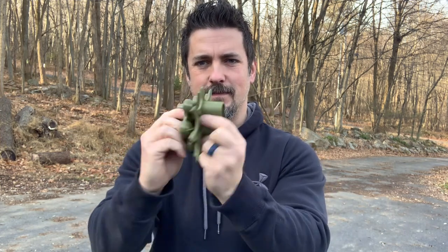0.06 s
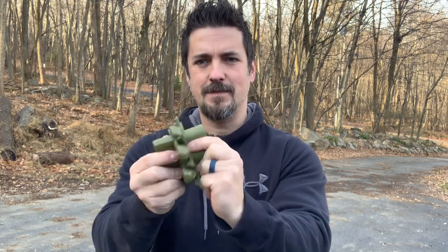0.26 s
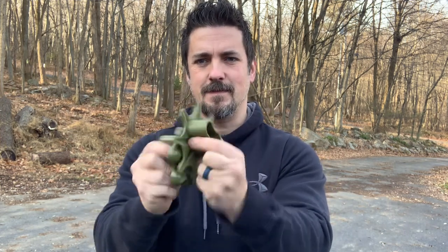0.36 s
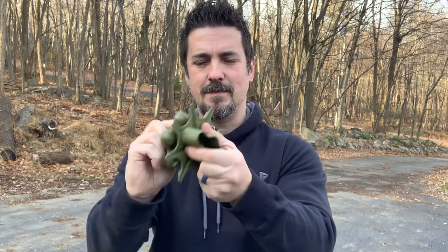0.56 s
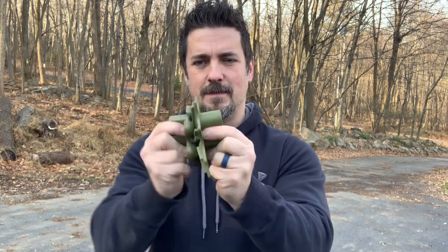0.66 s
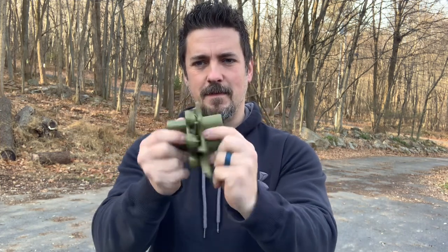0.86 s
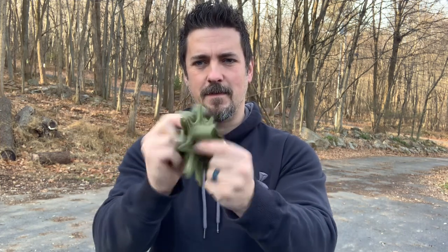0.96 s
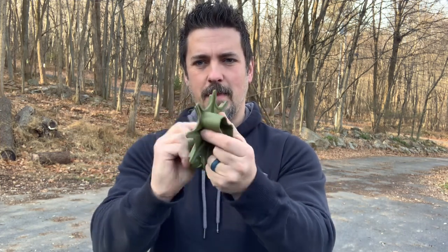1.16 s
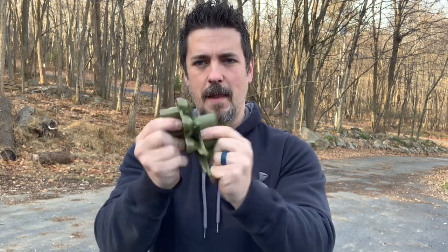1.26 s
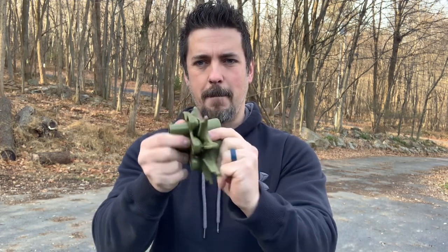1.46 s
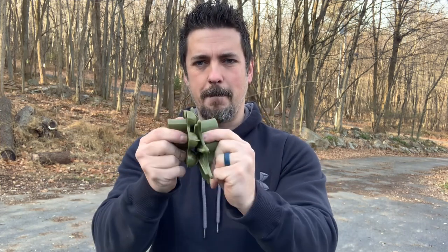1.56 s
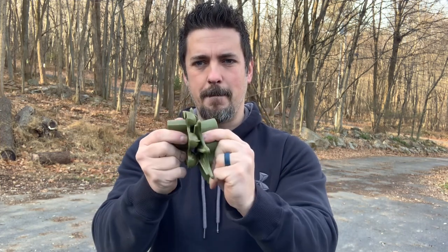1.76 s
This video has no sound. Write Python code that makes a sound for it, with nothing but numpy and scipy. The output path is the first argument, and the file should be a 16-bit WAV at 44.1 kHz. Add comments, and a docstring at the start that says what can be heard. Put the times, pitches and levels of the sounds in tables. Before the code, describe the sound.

A hand-held plastic deer rattle is worked close to a stereo microphone, sharp clicks and gritty scrapes coming in quick uneven clusters, with small hollow thunks, faint answers from the trees and a low outdoor rumble.

```python
"""Outdoors among trees, a hand-held deer rattle is worked in quick runs before a stereo microphone pair.
A low rumble with a trace of hiss lies behind it, made of filtered noise and stronger on the right.
Two toothed plastic halves clash and grind: each contact is a scraping crack of noise that rings
decaying plastic modes; square seatings add thunks of the hollow grips. Hands and body scatter the
sound close by, and the trunks answer faintly through decaying noise tails."""
import sys
import numpy as np
from scipy import signal
from scipy.fft import rfft, irfft, next_fast_len
from scipy.io import wavfile
from scipy.ndimage import uniform_filter1d, minimum_filter1d, map_coordinates

SR = 44100
rng = np.random.default_rng(int(sys.argv[2]) if len(sys.argv) > 2 else 0)


def bounce(signal):
    """Save signal as a 16-bit WAV file at the path given by the first command-line argument."""
    frames = np.transpose(np.atleast_2d(signal))
    limited = np.clip(frames, -1, 1)
    pcm = np.round(limited * 32767).astype(np.int16)
    wavfile.write(sys.argv[1], SR, pcm)


N = 79380  # samples, 1.8 s


def amp(db):
    """Decibels to gain."""
    return 10 ** (np.asarray(db) / 20)


def unit(x):
    """Scale to rms 1."""
    return x / np.sqrt(np.mean(x ** 2) + 1e-20)


def along(points, hz):
    """Read a curve of (frequency, value) points on a log frequency axis."""
    point_hz, value = np.transpose(points)
    return np.interp(np.log(hz + 1), np.log(point_hz + 1), value)


def filtered(x, response):
    """Filter x by a complex response, given as a function of frequency."""
    size = next_fast_len(N + SR // 2)
    spectrum = rfft(x, size) * response(np.fft.rfftfreq(size, 1 / SR))
    return irfft(spectrum, size)[..., :N]


def causal(gain):
    """Minimum-phase response with the shape of the given gain and unit energy."""
    cepstrum = irfft(np.log(gain + 1e-9))
    half = cepstrum.shape[-1] // 2
    # fold the backward half onto the forward half
    cepstrum[..., 1:half] *= 2
    cepstrum[..., half + 1:] = 0
    response = np.exp(rfft(cepstrum))
    return response / np.sqrt(np.mean(np.abs(response) ** 2, axis=-1, keepdims=True))


# colour of the outdoor floor: freq_hz [Hz], relative density_db [dB per Hz]
AIR_COLOUR = [(20, -39), (40, -12.5), (62, -1.5), (100, -10), (150, -15), (230, -28), (500, -35.5),
              (1000, -32.5), (2000, -32), (6000, -41.5), (8500, -62), (15000, -52.5)]
AIR_DB, AIR_LEFT_DB = -59, -13  # floor level; left against right
SWELL_DB, SWELL_POINTS_PER_S = 3.5, 13  # greatest rise or fall; random level points per second
RUMBLE_HZ = 220  # soft upper edge of the part that swells


def air():
    """Low outdoor rumble that swells gently under a steady trace of hiss, stronger on the right."""
    shared, extra = filtered(rng.standard_normal((2, N)), lambda hz: amp(along(AIR_COLOUR, hz)))
    pair = np.array([shared + .5 * extra, shared])
    rumble = filtered(pair, lambda hz: np.exp(-(hz / RUMBLE_HZ) ** 2))
    position = np.arange(N) * SWELL_POINTS_PER_S / SR
    wander = map_coordinates(rng.standard_normal(SR // 100), [position])
    swell = amp(SWELL_DB * np.tanh(wander))
    left, right = pair + (swell - 1) * rumble
    return amp(AIR_DB) * np.array([amp(AIR_LEFT_DB) * unit(left), unit(right)]) * np.sqrt(2)


def answer(colour, t60, size):
    """Stereo scatter tail of decaying noise, left at unit energy; t60 is a function of frequency."""
    hz, t, noise = signal.stft(rng.standard_normal((2, size)), SR, nperseg=256)
    hz = hz[:, None]
    level_db = along(colour, hz) - 60 * t / t60(hz)
    tail = signal.istft(noise * amp(level_db), SR, nperseg=256)[1]
    return tail / np.linalg.norm(tail[0])


# how long the trunks answer: freq_hz [Hz], t60_s [s]
TRUNK_DECAY = [(300, 1), (2000, 0.67), (7000, 0.44), (12000, 1.6)]
# colour of the trunks' answer: freq_hz [Hz], relative level_db [dB]
TRUNK_COLOUR = [(200, 18.5), (900, -1.5), (2000, 0), (5000, -2), (7400, -1), (8500, -10.5), (15000, -3)]
# colour of the close scatter off hands and body: freq_hz [Hz], relative level_db [dB]
BODY_COLOUR = [(300, 13.5), (2000, 23), (7000, -25), (10000, -3), (14000, 4.5)]
TRUNKS_DB, BODY_DB, BODY_T60_S = -23, -20, 0.05  # gain of each scatter; close decay


def woods(x, count=16):
    """Short scatter from hands and body, changing as they move, and a long faint answer from the trunks."""
    far = answer(TRUNK_COLOUR, lambda hz: along(TRUNK_DECAY, hz), SR)
    out = amp(TRUNKS_DB) * signal.fftconvolve(x[None], far, axes=1)[:, :N]
    for pose in range(count + 1):
        # crossfade from one pose to the next
        share = np.sqrt(np.maximum(0, 1 - np.abs(np.arange(N) * count / N - pose)))
        near = answer(BODY_COLOUR, lambda hz: BODY_T60_S, SR // 10)
        out += amp(BODY_DB) * signal.oaconvolve((x * share)[None], near, axes=1)[:, :N]
    return out


# level between the microphones: freq_hz [Hz], left_minus_right_db [dB]
MIC_BALANCE = [(100, -18.5), (400, -11.5), (750, -2), (1250, -4.5), (1800, -8.5), (2200, -9), (2700, -0.5),
               (3400, -17.5), (4700, -17.5), (5900, -14), (7100, 0.5), (8200, -1.5), (15000, 0.5)]
# phase between the microphones: freq_hz [Hz], left_lead_rad [rad]
MIC_LEAD = [(100, -2.5), (500, -1), (1050, -7), (1700, -6.5), (2600, -8), (3000, -8.5), (3600, -8),
            (4500, -7), (4900, -6), (6700, -4), (8000, -4), (11000, -2), (12700, -7)]


def ports(hz):
    """Gain and phase of the left and right microphones toward the rattle, at constant total power."""
    ratio = amp(along(MIC_BALANCE, hz))
    left = ratio * np.exp(1j * along(MIC_LEAD, hz))
    return np.array([left, np.ones(len(hz))]) * np.sqrt(2 / (1 + ratio ** 2))


RING_RISE_S, DETUNE = 0.00035, 0.02  # onset of every mode; its random spread of pitch, as a fraction
# modes of the hollow grips: pitch_hz [Hz, before detuning], relative level_db [dB], t60_s [s]
GRIP_MODES = [(915, -3, 0.039), (1134, 5.5, 0.014)]
# the halves seat squarely: start_s [s], level_db [dB, added to each mode's]
SEATINGS = [(0.246, -31), (0.4223, -29.5), (0.538, -38), (0.5556, -33), (0.7335, -34.5), (1.3083, -41),
            (1.3201, -26.5), (1.6103, -38)]


def knocks(size=4096):
    """When the halves seat squarely, the hollow grips give a short thunk of decaying modes."""
    t = np.arange(size) / SR
    out = np.zeros(N + size)
    for start_s, level_db in SEATINGS:
        start = round(start_s * SR)
        for pitch_hz, db, t60 in GRIP_MODES:
            fade = amp(level_db + db - 60 * t / t60) * (1 - np.exp(-t / RING_RISE_S))
            tuned_hz = pitch_hz * (1 + DETUNE * rng.standard_normal())
            out[start:start + size] += fade * np.sin(2 * np.pi * tuned_hz * t)
    return out[:N]


# colour of plastic slipping on plastic: freq_hz [Hz], relative density_db [dB per Hz]
CRACK_COLOUR = [(100, -34), (350, -20.5), (620, -18.5), (950, -16), (1350, -3.5), (1800, -3), (2200, 1),
                (2680, -9), (3150, -8.5), (3650, -3), (4300, -9), (4800, -11.5), (5900, -11), (7200, -15.5),
                (8000, -27), (9300, -21.5), (12200, -40), (14400, -43), (16000, -48.5)]


def crack(size):
    """Spectrum of one sharp slip of plastic on plastic."""
    return causal(amp(along(CRACK_COLOUR, np.fft.rfftfreq(size, 1 / SR))))


GRIND_PER_S, GRIND_DB = 1300, -19  # mean rate of slips; gain against the contact pressure
GRIND_AFTER_S = 0.0072  # time constant of the pressure's power


def grinding(clicks, size=4096):
    """Tiny slips at random moments follow each contact while the teeth slide under pressure."""
    keep = np.exp(-1 / (GRIND_AFTER_S * SR))
    pressure = np.sqrt(signal.lfilter([1 - keep], [1, -keep], clicks ** 2))
    slips = (rng.random(N) < GRIND_PER_S / SR) * rng.standard_normal(N)
    body = irfft(crack(size))
    return amp(GRIND_DB) * signal.fftconvolve(unit(slips) * pressure, body)[:N]


# modes of the plastic: pitch_hz [Hz, before detuning], relative level_db [dB], t60_s [s]
PLASTIC_MODES = [(1687, -7.5, 0.016), (1779, -1, 0.025), (2280, 1.5, 0.0087), (3070, -7, 0.04),
                 (3235, -0.5, 0.021), (3679, 3.5, 0.027), (4223, -11.5, .028), (4790, -1.5, 0.014),
                 (5547, -2, 0.012), (7390, -23.5, 0.025)]
CRACK_T60_S, CRACK_RISE_S = 0.0059, 0.0019
RING_DB, MODE_SCATTER_DB = -22, 0.5  # ring against crack; random spread of each mode's level
REBOUND_S, REBOUND_DB = 0.0025, -11  # a tooth bounces once: mean flight, level against the blow
SCRAPE_DB, SCRAPE_RISE_S, SCRAPE_FADE_S = -18, 0.0038, 0.0043  # level at mean force; around the blow
LIGHT_SCRAPES = 0.98  # dB more scrape for each dB that a contact is lighter


def strike(t):
    """Envelope of one blow: a quick rise into an exponential fade."""
    return amp(-60 * t / CRACK_T60_S) * (1 - np.exp(-t / CRACK_RISE_S))


def contacts(force_db, lead, size=4096):
    """Spectra of contacts: crack, rebound and brief scrape, plus modes struck differently each time."""
    count = len(force_db)
    clock = (np.arange(size) - lead) / SR  # zero at the blow
    t = np.maximum(clock, 0)
    flight = REBOUND_S * (.5 + rng.random((count, 1)))
    blow = strike(t) + amp(REBOUND_DB) * strike(np.maximum(clock - flight, 0))
    scrape_db = SCRAPE_DB - LIGHT_SCRAPES * (force_db - force_db.mean())[:, None]
    slide = np.exp(np.minimum(clock, 0) / SCRAPE_RISE_S - t / SCRAPE_FADE_S)
    scrape = amp(scrape_db) * strike(t).max() * slide
    # a product of two noises is spikier than one
    slips = rng.standard_normal((count, size)) * rng.standard_normal((count, size))
    ring = np.zeros((count, size))
    for pitch_hz, db, t60 in PLASTIC_MODES:
        gain, tune, phase = rng.standard_normal((count, 3)).T[:, :, None]
        fade = amp(-60 * t / t60) * (1 - np.exp(-t / RING_RISE_S))
        tone = np.sin(2 * np.pi * (pitch_hz * (1 + DETUNE * tune) * t + phase))
        ring += amp(db + MODE_SCATTER_DB * gain) * fade * tone
    return rfft(slips * (blow + scrape)) * crack(size) + amp(RING_DB) * rfft(ring)


# borders between low ring, upper ring, snap and sizzle: edge_hz [Hz]
BAND_EDGES = [2846, 4870, 7630]
# tooth contacts: start_s [s]; relative low_ring_db, upper_ring_db, snap_db [dB]; low_ring_hz [Hz]
TOOTH_CONTACTS = [(0.119, -48.5, -52, -59, 1700), (0.1651, -28.5, -34.5, -46.5, 1920),
                  (0.2067, -35.5, -34.5, -46, 2130), (0.2203, -16.5, -22, -19.5, 1860),
                  (0.232, -10.5, -11, -28, 1790), (0.2393, -21.5, -17, -38, 1960),
                  (0.2426, -11.5, -12.5, -14.5, 1960), (0.248, -18, -16, -21.5, 1900),
                  (0.2581, -31.5, -24.5, -34, 1880), (0.2659, -24, -16, -24.5, 1940),
                  (0.2692, -23.5, -29.5, -31.5, 1760), (0.3666, -47, -52, -58, 1750),
                  (0.408, -20, -30, -34, 1820), (0.4177, -11.5, -11, -23, 2000),
                  (0.4221, -11, -48, -12.5, 2140), (0.4255, -19.5, -17, -25.5, 2100),
                  (0.4775, -21, -20.5, -30, 1900), (0.4837, -19, -56, -30, 2050),
                  (0.4876, -19.5, -25, -30.5, 1910), (0.508, -23, -28, -46, 1630),
                  (0.537, -20, -20.5, -28.5, 1830), (0.5557, -21, -18, -29.5, 1800),
                  (0.5597, -25.5, -21.5, -26, 1900), (0.579, -18.5, -24.5, -32, 1960),
                  (0.601, -26.5, -11.5, -20, 1970), (0.604, -18.5, -19, -38, 2020),
                  (0.6115, -23, -21.5, -30, 1810), (0.6344, -18, -14, -35, 1800),
                  (0.6395, -26.5, -21, -23, 1830), (0.6541, -11.5, -13, -25, 2120),
                  (0.6691, -27, -22.5, -42, 2030), (0.698, -32.5, -58.5, -59.5, 1960),
                  (0.7038, -18.5, -18.5, -28.5, 2020), (0.7125, -13, -20, -11.5, 2300),
                  (0.7162, -16, -9, -13.5, 2080), (0.7185, -11, -18, -24.5, 2190),
                  (0.7324, -12, -15.5, -13, 1700), (0.735, -17.5, -11, -24.5, 1810),
                  (0.7427, -22, -16, -34, 1740), (0.7495, -10.5, -16.5, -16, 2156),
                  (0.753, -20, -13.5, -17.5, 2000), (0.7616, -30.5, -25, -25.5, 2066),
                  (0.768, -26.5, -20.5, -26.5, 1900), (0.7809, -22.5, -20.5, -26, 1770),
                  (0.8325, -41.5, -35.5, -49, 1790), (0.8485, -21.5, -28, -32.5, 1760),
                  (0.8646, -18, -25, -32, 2040), (0.8803, -24, -25.5, -33, 1840),
                  (0.8925, -32.5, -31, -48, 1860), (0.933, -33, -39, -47, 1890),
                  (0.9413, -29, -34, -60.5, 1780), (0.9513, -26.5, -30, -44, 1630),
                  (0.9646, -21, -21, -31, 1600), (0.9915, -8.5, -11.5, -13, 1910),
                  (1.0063, -9, -19.5, -18.5, 2150), (1.0095, -17, -10, -20, 1990),
                  (1.0121, -18, -41, -17.5, 1980), (1.0194, -20, -16.5, -28, 2060),
                  (1.0269, -20, -26.5, -25.5, 2140), (1.05, -37.5, -32.5, -54, 1850),
                  (1.0625, -35.5, -49.5, -36, 1900), (1.0711, -19, -17, -12.5, 2110),
                  (1.0746, -18, -10.5, -13.5, 2080), (1.08, -21.5, -17, -33, 1910),
                  (1.0824, -17.5, -29.5, -23, 1980), (1.1547, -27, -32.5, -31.5, 2000),
                  (1.1694, -22.5, -16, -44.5, 1800), (1.1741, -14, -31, -18.5, 2060),
                  (1.2054, -26.5, -26.5, -39, 1620), (1.2115, -34.5, -22, -40.5, 1850),
                  (1.223, -23, -29.5, -51.5, 1900), (1.2454, -37.5, -41, -47, 1850),
                  (1.284, -35.5, -31, -39.5, 2140), (1.2904, -28.5, -35.5, -34, 1810),
                  (1.2999, -32.5, -27.5, -35.5, 1700), (1.3076, -13.5, -16, -24.5, 2200),
                  (1.3113, -17.5, -32.5, -21.5, 2040), (1.3197, -14.5, -11.5, -15.5, 1730),
                  (1.3551, -19, -25.5, -30.5, 1770), (1.3608, -19.5, -39.5, -25, 1780),
                  (1.3687, -18, -28, -20.5, 1720), (1.3724, -9, -16, -25, 1720),
                  (1.3775, -18, -14, -9, 1760), (1.4356, -9, -16.5, -21.5, 1740),
                  (1.456, -27.5, -33, -33.5, 1970), (1.462, -17.5, -20.5, -27.5, 1730),
                  (1.4673, -13.5, -14.5, -17.5, 1730), (1.5005, -17.5, -15.5, -19, 1580),
                  (1.5889, -24.5, -26.5, -39, 1840), (1.5975, -29, -60.5, -57.5, 1713),
                  (1.61, -27, -21.5, -30, 1750)]
CLICK_DB, CLICK_S = -0.5, 0.0022  # gain on all contacts; time over which a level is counted
FOCUS_DB, FOCUS_WIDTH_HZ = 14, 316  # the point struck favours one part of the low ring
RIPPLE_DB, RIPPLE_STEP_HZ = 2.5, 384.6  # random smooth ripple in each contact's colour: depth, point spacing
# top octave against the snap at a reference snap level; dB of sizzle per dB of snap
SIZZLE_DB, SIZZLE_REF_DB, SIZZLE_GROWS = -16.5, -23.5, 1.134


def teeth(size=4096, order=16):
    """Tooth contacts, each with its own balance of ring and snap; hard snaps sizzle more."""
    times, low_db, upper_db, snap_db, centre_hz = np.transpose(TOOTH_CONTACTS)
    sizzle_db = SIZZLE_REF_DB + SIZZLE_DB + SIZZLE_GROWS * (snap_db - SIZZLE_REF_DB)
    hz = np.fft.rfftfreq(size, 1 / SR)
    low, upper, snap = (1 / (1 + (hz / edge) ** order) for edge in BAND_EDGES)
    bands = [(low, low_db), (upper - low, upper_db), (snap - upper, snap_db), (1 - snap, sizzle_db)]
    lead = size // 8  # samples kept free for the scrape before the blow
    focus = amp(FOCUS_DB / (1 + ((hz - centre_hz[:, None]) / FOCUS_WIDTH_HZ) ** 2))
    knots = rng.standard_normal((len(times), size // 32))
    ripple = [map_coordinates(row, [hz / RIPPLE_STEP_HZ], mode="mirror") for row in knots]
    focus = focus * amp(RIPPLE_DB * np.array(ripple))
    raw = contacts(np.maximum(low_db, upper_db), lead)
    colour = 0
    for band, db in bands:
        # bring each band of each contact to its own level
        norm = np.linalg.norm(irfft(raw * focus * band), axis=1)
        gain = amp(db + CLICK_DB) * np.sqrt(CLICK_S * SR) / norm
        colour = colour + focus * band * gain[:, None]
    clicks = irfft(raw * causal(colour)) * np.sqrt(np.mean(colour ** 2, axis=1, keepdims=True))
    out = np.zeros(N + 2 * size)
    for start_s, click in zip(times, clicks):
        start = round(start_s * SR)
        out[start:start + size] += click
    return out[lead:lead + N]


PORT_UNLIKE = 0.42  # share of amplitude that the left microphone hears differently


def scene():
    """The rattle at the two microphones, with the woods and the air."""
    clicks = teeth()
    rattle = clicks + grinding(clicks) + knocks()
    left = np.sqrt(1 - PORT_UNLIKE ** 2) * rattle + PORT_UNLIKE * teeth()
    pair = np.array([left, rattle])
    return filtered(pair + woods(rattle), ports) + air()


CEILING, LIMIT_S = 1, 0.0022  # limiter: highest level; time over which it ducks
TOP_HZ = 15900  # band limit


def record(dry):
    """The recorder ducks the hardest peaks on both channels, then cuts steeply above its band limit."""
    size = int(LIMIT_S * SR)
    needed = np.minimum(1, CEILING / (np.abs(dry).max(axis=0) + 1e-9))
    gain = uniform_filter1d(minimum_filter1d(needed, size), size)
    return filtered(dry * gain, lambda hz: 1 / (1 + (hz / TOP_HZ) ** 80))


dry = scene()
out = record(dry)
bounce(out)
```